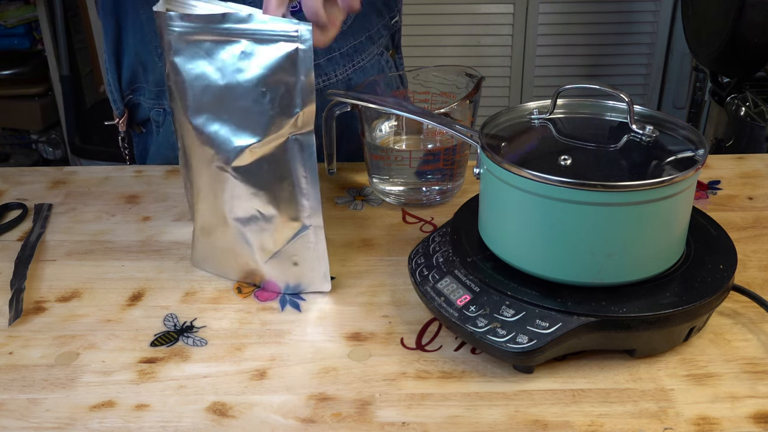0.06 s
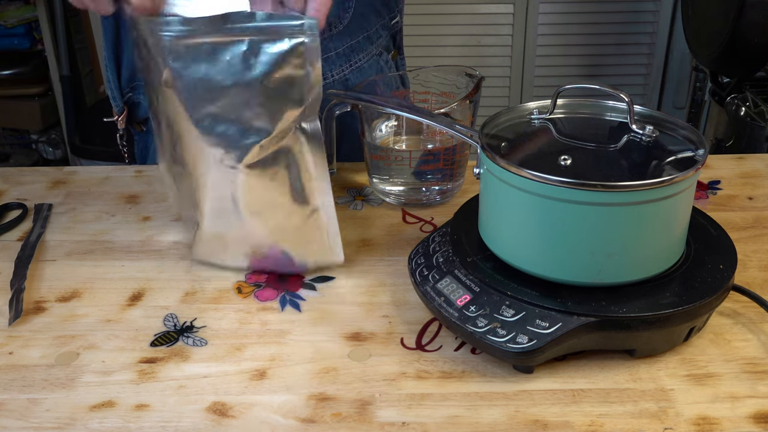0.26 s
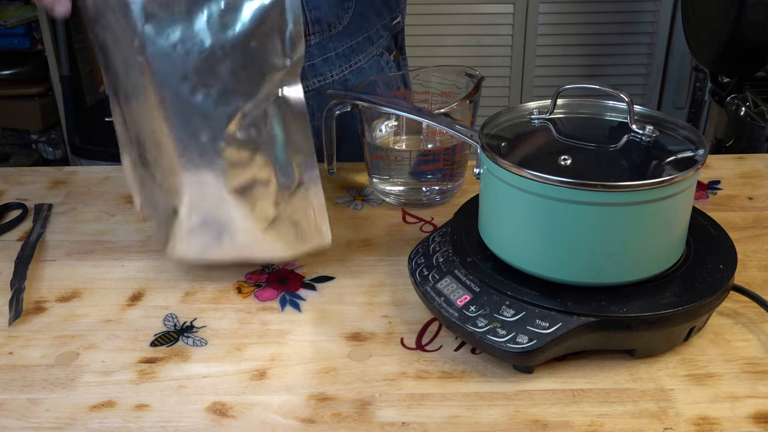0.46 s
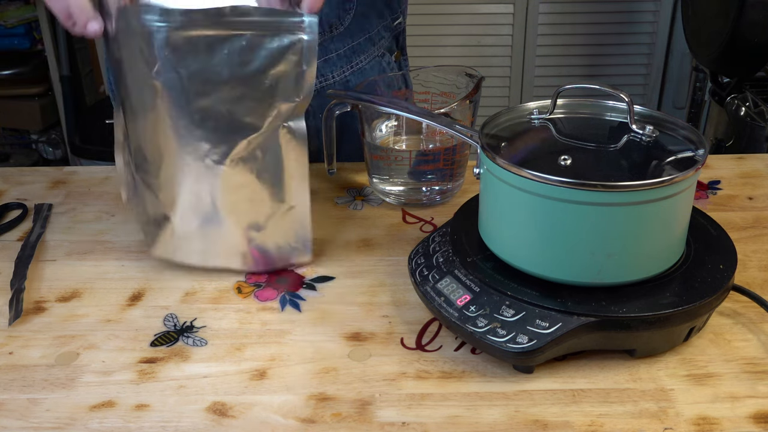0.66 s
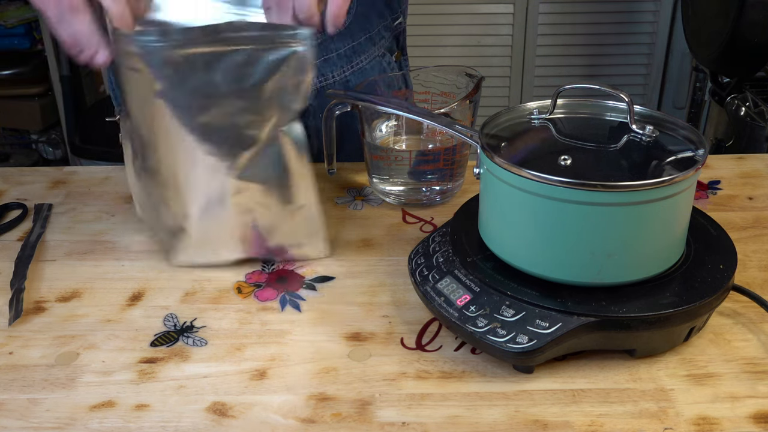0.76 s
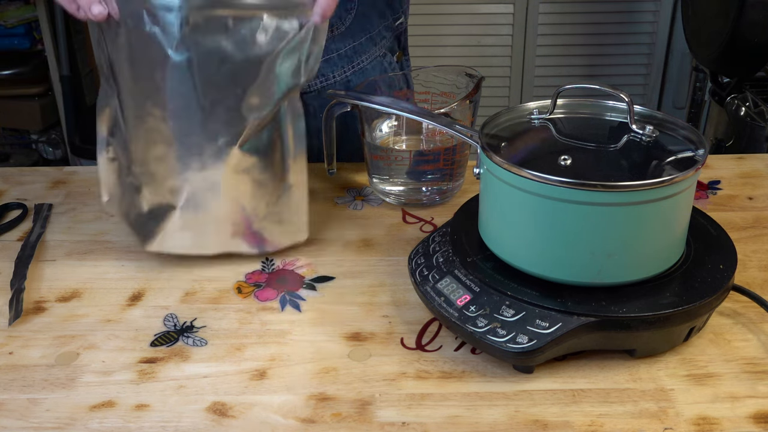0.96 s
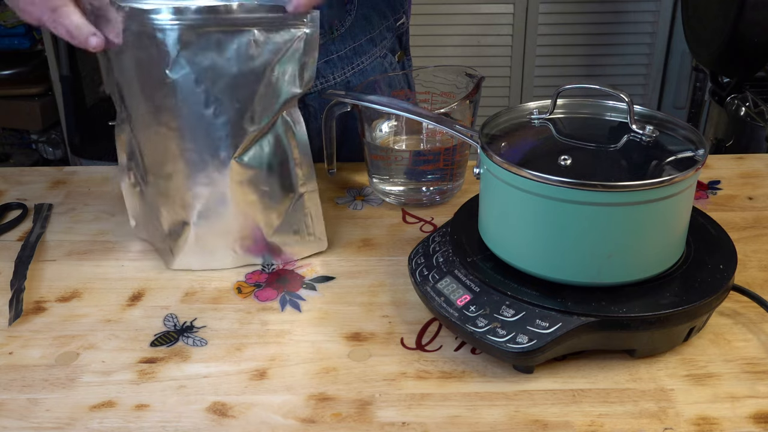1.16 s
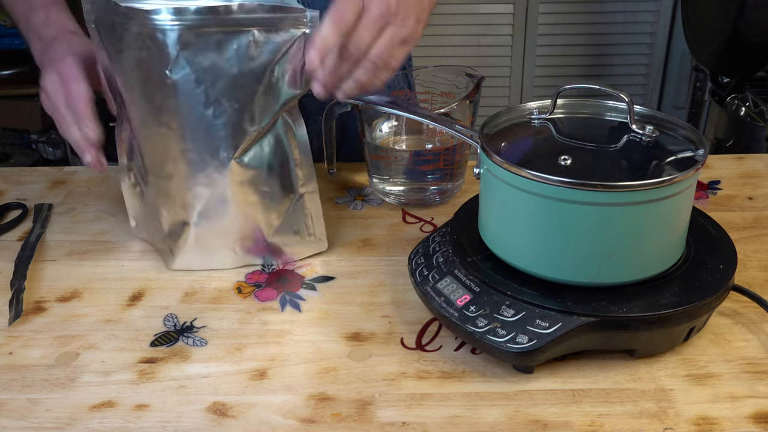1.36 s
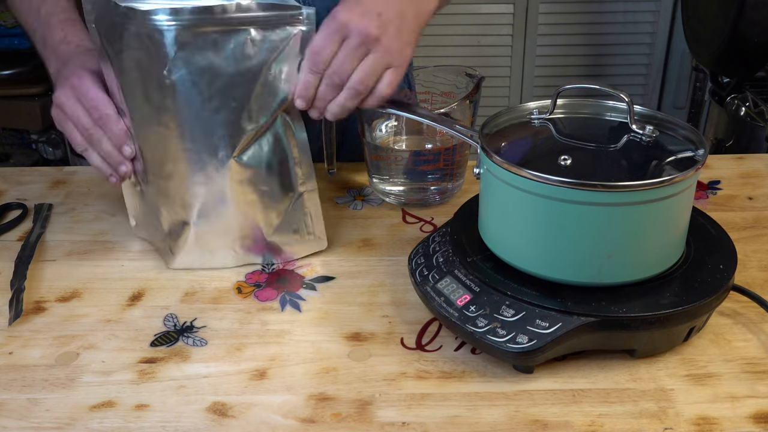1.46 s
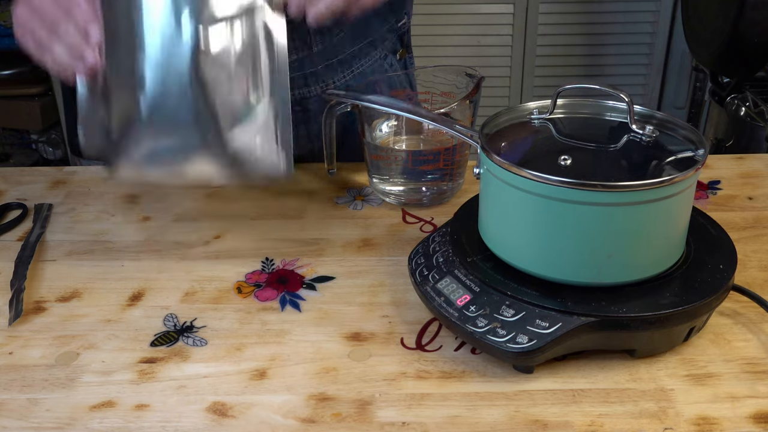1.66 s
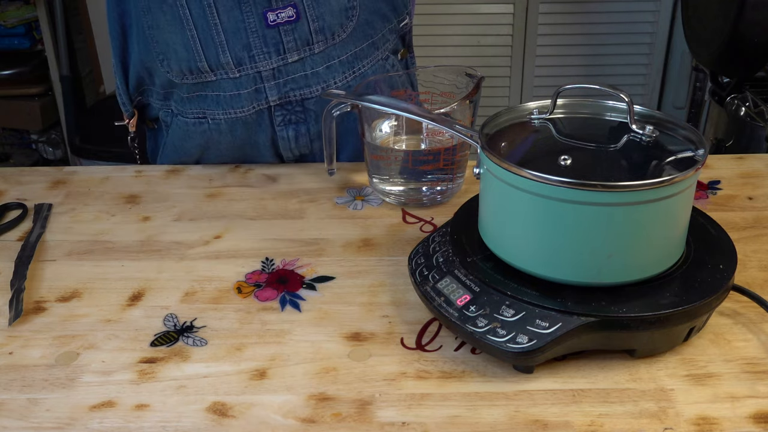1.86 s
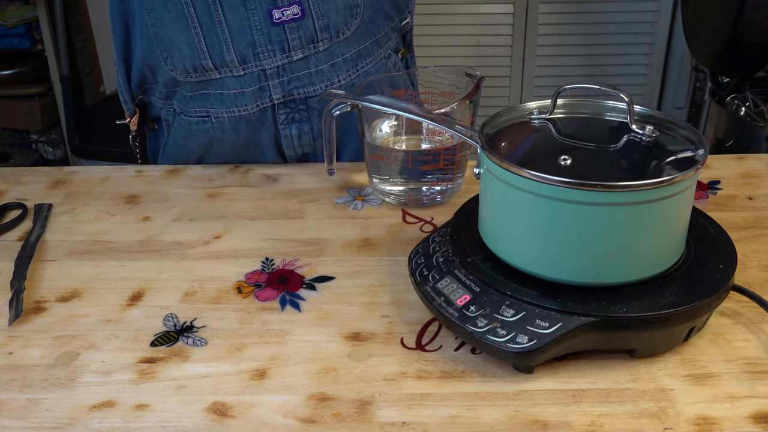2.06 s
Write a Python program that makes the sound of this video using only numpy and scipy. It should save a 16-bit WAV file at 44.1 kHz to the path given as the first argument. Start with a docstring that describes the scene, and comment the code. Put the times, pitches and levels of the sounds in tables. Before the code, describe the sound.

A stiff foil bag crinkles and snaps sharply as hands open and lift it, close up

```python
"""A stiff foil bag is pulled open and lifted by hand, close to the microphone in a small room.
Creases snap in short clusters of clicks that ring a foil panel, push the air in the bag and crack bright.
Fine crackle, made of short ringing grains, follows the handling in separate rustles.
The room adds a brief tail of filtered noise; a fan hum in three noise bands and faint hiss lie beneath."""
import sys
import numpy as np
from scipy import signal
from scipy.fft import rfft, irfft
from scipy.io import wavfile
from scipy.ndimage import uniform_filter1d

SR = 44100
rng = np.random.default_rng(int(sys.argv[2]) if len(sys.argv) > 2 else 0)


def bounce(signal):
    """Save signal as a 16-bit WAV file at the path given by the first command-line argument."""
    frames = np.transpose(np.atleast_2d(signal))
    limited = np.clip(frames, -1, 1)
    pcm = np.round(limited * 32767).astype(np.int16)
    wavfile.write(sys.argv[1], SR, pcm)


N = 92610  # samples, 2.1 s

# Creases giving way: (time [s], panel peak [dB], panel pitch [Hz], flutter rate [Hz], bag thud rms [dB],
# crack pitch [Hz], crack rms [dB], sizzle rms [dB], cluster length [ms])
CREASE_SNAPS = [(.176, -25, 1080, 580, -41, 2750, -54, -48, 2),
                (0.1959, -23, 1160, 570, -33, 2980, -35.5, -76, 2.6),
                (.205, -19, 744, 622, -44, 2620, -42, -58, 3.7),
                (.249, -20.5, 1420, 1440, -52, 2750, -59, -64, 4.5),
                (.267, -18, 1330, 662, -49, 4140, -34.5, -79, 4.4),
                (.309, -14.5, 1240, 444, -27.5, 2520, -36.5, -64, 4.2),
                (.342, -7.5, 1880, 530, -29.5, 5260, -22.5, -30, 1.37),
                (0.43, -30, 1230, 590, -73, 5820, -41, -50, 1.5),
                (0.55, -40, 1030, 600, -74, 3270, -52, -63, 0.72),
                (.588, -4.5, 1044, 1087, -23, 2770, -27, -34, 1.75),
                (0.5935, -8.5, 625, 566, -20.5, 3150, -22, -39, 3),
                (0.657, -19, 960, 492, -49, 2720, -52, -62, 3.1),
                (.716, -14.5, 830, 586, -24.5, 5150, -17.5, -64.5, 1.03),
                (0.727, -21.5, 2200, 2240, -44, 5610, -47, -38, 4.2),
                (0.782, -6, 960, 803, -36, 2540, -20.5, -29, 6.8),
                (0.786, -6.5, 1150, 1175, -44, 3290, -20.5, -40.5, 3.3),
                (.8132, -15.5, 1280, 1207, -27.5, 4560, -21, -56, 0.59),
                (.847, -14.5, 1210, 430, -30, 3520, -50, -41, 2.8),
                (.854, -13.5, 1450, 1360, -25, 3500, -23, -54, 3.4),
                (.887, -20, 1660, 1810, -38.5, 4470, -49, -35.5, 2.4),
                (0.905, -27.5, 1360, 483, -35, 4330, -38.5, -41, 3.8),
                (0.932, -12.5, 1010, 513, -31.5, 2880, -33, -36, 2.5),
                (.949, -10.5, 1200, 548, -25.5, 5000, -22.5, -25, 2.2),
                (0.973, -22.5, 1500, 499, -26, 2550, -28, -33.5, 9.1),
                (1.0624, -8.5, 1060, 1094, -25, 4040, -25, -35.5, 1.55),
                (1.175, -46.5, 666, 500, -40, 2830, -40.5, -38, 2.5),
                (1.304, -28.5, 852, 490, -40.5, 2675, -62, -56, 1),
                (1.489, -31.5, 673, 539, -40, 3900, -40, -53.5, 3.2),
                (1.532, -26.5, 1390, 640, -61, 2720, -46, -43, 2.6),
                (1.649, -24.5, 1140, 404, -39, 4400, -40, -45, 2.3),
                (1.790, -11.5, 1050, 765, -38.5, 2120, -20.5, -46.5, 0.76),
                (2.002, -47, 1980, 706, -60, 7400, -52, -69, 4.4)]
# Rustles of the handled foil: (start [s], held [s], body rms [dB], treble rms [dB])
RUSTLES = [(0, 0.073, -64, -71), (0.11, 0.31, -48, -51), (0.193, 0.085, -36.5, -45.5),
           (0.31, 0.071, -38, -40.5), (0.411, 0.088, -47.5, -48), (0.512, 0.14, -54, -54),
           (0.596, 0.074, -31, -38.5), (0.678, 0.079, -42, -42.5), (0.792, 0.078, -29, -33.5),
           (0.88, 0.122, -38.5, -40.5), (1.065, 0.087, -33, -38), (1.153, 0.041, -43, -43.5),
           (1.21, 0.066, -52, -56.5), (1.264, 0.029, -37.5, -40.5), (1.491, 0.064, -46, -49.5),
           (1.527, 0.095, -42.5, -44), (1.63, 0.033, -44, -50.5), (1.70, 0.13, -52, -54),
           (1.802, 0.097, -52.5, -57), (1.89, 0.12, -61.5, -62), (2.0, 0.13, -60.5, -60)]
# Colour of the foil crackle: (frequency [Hz], relative density [dB per Hz])
FOIL_COLOUR = [(120, -16), (250, -6), (400, -2), (800, -3), (1600, -9), (4000, -14), (9000, -22),
               (15000, -24)]
# Reverberation time of the small room: (frequency [Hz], T60 [s])
ROOM_T60 = [(150, 0.13), (500, 0.42), (2000, 0.22), (6000, 0.38), (15000, 0.053)]
# Fan hum bands: (frequency [Hz], width of each filter pass [Hz], rms [dB])
FAN_BANDS = [(105, 48, -69), (219, 14, -66), (348, 190, -61)]
# Colour of the hiss: (frequency [Hz], relative density [dB per Hz])
HISS_COLOUR = [(30, -60.5), (100, -20), (300, -13.5), (600, -18.5), (1500, -20), (7000, -37),
               (16000, -30.5)]

# Crackle: grains shared by all bands, and grains heard at one pitch only
GRAINS_PER_S, GRAIN_SCATTER_DB, GRAIN_Q = 2500, 4, 1.43
OWN_PER_S_AT_1KHZ, OWN_Q, OWN_SHARE = 600, 1.96, 2.73  # share is an amplitude factor
LARGEST_CLICK = 2.9  # in scatter steps, for grains and snap clicks alike
TREBLE_HZ = 2500  # crackle bands from here up follow the treble levels
RISE_S, FADE_S = 0.0025, 0.0085
CLUMPS_PER_S, CLUMP_DB = 220, 3

# Snaps
CLICK_SCATTER_DB, LEAD_DB = 3.5, 20.5  # lead: the sharp click
BUILD_SHARE = 0.7  # build-up before the sharp click, as a share of the cluster length
AFTER_DB, AFTER_MS = -2, 3.8  # weaker clicks as the crease settles
PANEL_FEELS_DB = -10  # panel and bag air follow the sharp click more than the rest
RING_MS, RING_PER_MS = 0.9, 0.55  # the echoes ring on, longer after a long cluster
FLUTTER_TOP_HZ = 5000  # each echo between the bag's walls loses treble above this
PANEL_Q, THUD_HZ, THUD_Q = 0.92, 424, 0.96
CRACK_Q, SIZZLE_HZ, SIZZLE_Q = 0.79, 13400, 1
RMS_MS = 5.85  # time over which the snap rms levels are counted

BAG_LOW_HZ = 149
ROOM_DB, ROOM_GAP_MS = -12.5, 2.7  # tail energy against the direct sound; wait before the tail
HISS_DB = -63  # rms
CEILING, TOP_HZ = 1.6, 15900  # recorder: soft limit [amplitude], top of the band [Hz]


def undb(db):
    """Decibels to an amplitude factor."""
    return 10 ** (np.asarray(db) / 20)


def level(x, db):
    """Set the rms level."""
    return x * undb(db) / np.sqrt(np.mean(x ** 2))


def ring(x, hz, q):
    """Two-pole resonance."""
    return signal.lfilter(*signal.iirpeak(min(hz, .45 * SR), max(q, .3), fs=SR), x)


def ring_twice(x, hz, q):
    """The same resonance passed twice, with steeper skirts."""
    return ring(ring(x, hz, q), hz, q)


def table(rows, hz):
    """Read a table at a frequency, along a logarithmic pitch axis."""
    rows = np.array(rows)
    return np.interp(np.log(hz), np.log(rows[:, 0]), rows[:, 1])


def clicks(chance, scatter_db):
    """Clicks of either sign, mostly small, a few large; chance holds two uniform rows."""
    sign = np.sign(chance[0] - .5)
    steps = np.minimum(-np.log(1 - chance[1]), LARGEST_CLICK)
    return sign * undb(scatter_db * steps)


def grains(per_s):
    """Clicks scattered at random moments, one for each small crease."""
    sizes = clicks(rng.random((2, N)), GRAIN_SCATTER_DB)
    return sizes * (rng.random(N) < per_s / SR)


def rustle_gain(column):
    """Handling level over time: each rustle starts fast, holds and fades."""
    t = np.arange(N) / SR
    power = 0
    for row in RUSTLES:
        start, held = row[:2]
        rise = np.clip((t - start) / RISE_S, 0, 1)
        fade = np.exp(-np.maximum(t - start - held, 0) / FADE_S)
        power = power + (undb(row[column]) * rise * fade) ** 2
    return np.sqrt(power)


def crackle():
    """Small creases all over the foil: short grains ring at every pitch and clump unevenly in rustles."""
    body, treble = 0, 0
    shared = grains(GRAINS_PER_S)
    for k, hz in enumerate(150 * 2 ** np.arange(0, 6.8, .5)):  # half-octave bands
        own = grains(OWN_PER_S_AT_1KHZ * hz / 1000)
        # the shared grains alternate in sign from band to band
        mix = ring((-1) ** k * shared, hz, GRAIN_Q) + OWN_SHARE * ring(own, hz, OWN_Q)
        band = level(ring(mix, hz, GRAIN_Q), table(FOIL_COLOUR, hz))
        band = band * np.sqrt(hz)  # density per Hz to band level
        if hz < TREBLE_HZ:
            body = body + band
        else:
            treble = treble + band
    step = int(SR / CLUMPS_PER_S)
    wander = np.repeat(rng.standard_normal(N // step + 1), step)
    clumps = undb(CLUMP_DB * uniform_filter1d(wander, step // 2)[:N])
    return level(body * clumps, 0) * rustle_gain(2) + level(treble * clumps, 0) * rustle_gain(3)


def background():
    """A fan hums in three narrow noise bands over faint coloured hiss."""
    hz = np.maximum(np.arange(N // 2 + 1) * SR / N, 1)
    spectrum = rfft(rng.standard_normal(N)) * undb(table(HISS_COLOUR, hz))
    out = level(irfft(spectrum, N), HISS_DB)
    for band_hz, width_hz, db in FAN_BANDS:
        hum = ring_twice(rng.standard_normal(N), band_hz, band_hz / width_hz)
        out = out + level(hum, db)
    return out


def room(x):
    """Dense echoes: octave bands of noise, each dying at its own rate, after a short gap."""
    t = np.arange(SR // 2) / SR
    tail = 0
    for hz in 125 * 2. ** np.arange(8):
        noise = level(ring(rng.standard_normal(len(t)), hz, 1.1), 0)
        tail = tail + np.sqrt(hz) * noise * undb(-60 * t / table(ROOM_T60, hz))
    tail = tail * (t > ROOM_GAP_MS / 1000)
    return signal.fftconvolve(x, tail * undb(ROOM_DB) / np.sqrt(np.sum(tail ** 2)))[:N]


def flutter(x, trips_hz, ring_ms):
    """A click echoes to and fro between the bag's walls, weaker and duller on every trip."""
    hz = np.arange(len(x) + 1) * SR / (2 * len(x))
    trip = np.exp(-(1000 / ring_ms + 2j * np.pi * hz) / trips_hz)
    trip = trip / np.hypot(1, hz / FLUTTER_TOP_HZ)
    return irfft(rfft(x, 2 * len(x)) / (1 - trip))[:len(x)]  # sum of all trips


def snap_rms(x, db):
    """Set the rms level of a snap, its energy counted over RMS_MS."""
    return x * undb(db) / np.sqrt(np.sum(x ** 2) / (RMS_MS * SR / 1000))


def snaps():
    """Each crease gives a cluster of clicks, swelling and dying, into panel, bag air, crack and sizzle."""
    size, lead = 2048, 400  # samples: whole snap, and its build-up before the sharp click
    out = np.zeros(N + size)
    t_ms = (np.arange(size) - lead) / SR * 1000
    for s, panel_db, panel_hz, flutter_hz, thud_db, crack_hz, crack_db, sizzle_db, ms in CREASE_SNAPS:
        cluster = np.exp(-(t_ms / np.where(t_ms < 0, BUILD_SHARE * ms, ms)) ** 2)
        settling = (t_ms > 0) * undb(AFTER_DB) * np.exp(-t_ms / AFTER_MS)
        push = clicks(rng.random((2, size)), CLICK_SCATTER_DB) * (cluster + settling)
        soft = undb(PANEL_FEELS_DB) * push
        push[lead] = soft[lead] = undb(LEAD_DB)  # the crease gives way with one sharp click
        ring_ms = RING_MS + RING_PER_MS * ms
        soft = flutter(soft, flutter_hz, ring_ms)
        hard = flutter(push, flutter_hz, ring_ms)
        panel = ring_twice(soft, panel_hz, PANEL_Q)
        panel = panel * undb(panel_db) / np.abs(panel).max()
        thud = snap_rms(ring_twice(soft, THUD_HZ, THUD_Q), thud_db)
        crack = snap_rms(ring_twice(hard, crack_hz, CRACK_Q), crack_db)
        sizzle = snap_rms(ring_twice(push, SIZZLE_HZ, SIZZLE_Q), sizzle_db)
        first = int(s * SR) - lead
        # neighbouring bands alternate in sign, so that they join without a gap
        out[first:first + size] += panel - thud + sizzle - crack
    return out[:N]


def scene():
    """The close bag, its room tail and the background, on one channel."""
    foil = snaps() + crackle()
    bass_cut = signal.butter(2, BAG_LOW_HZ, "high", fs=SR, output="sos")
    foil = signal.sosfilt(bass_cut, foil)  # a small bag gives no bass
    return (foil + room(foil) + background())[None]


def record(dry):
    """The recorder rounds the loudest peaks and cuts the top."""
    rounded = CEILING * np.tanh(dry / CEILING)
    return signal.sosfilt(signal.ellip(8, .2, 70, TOP_HZ, fs=SR, output="sos"), rounded)


dry = scene()
out = record(dry)
bounce(out)
```